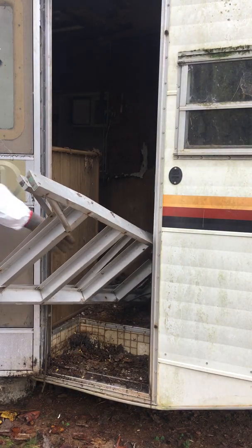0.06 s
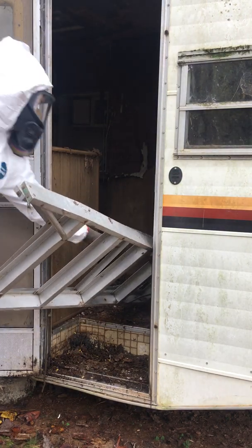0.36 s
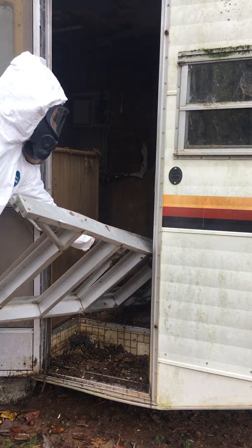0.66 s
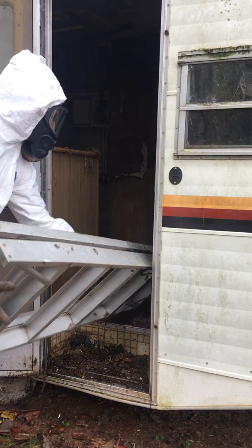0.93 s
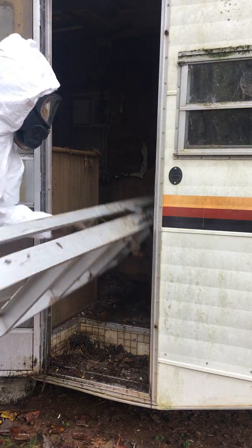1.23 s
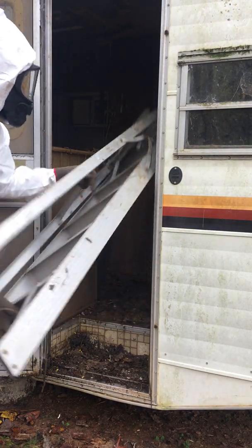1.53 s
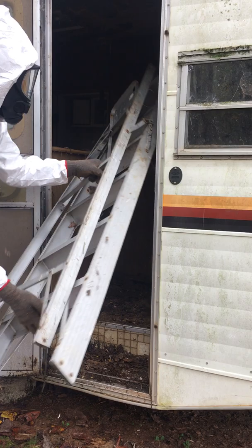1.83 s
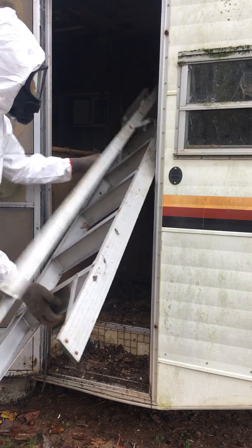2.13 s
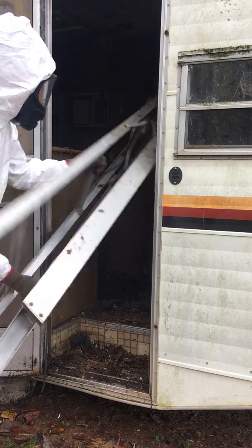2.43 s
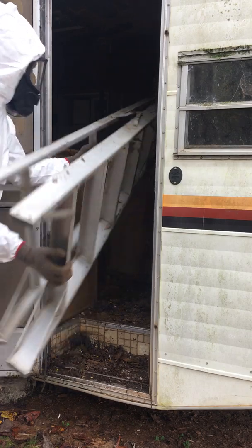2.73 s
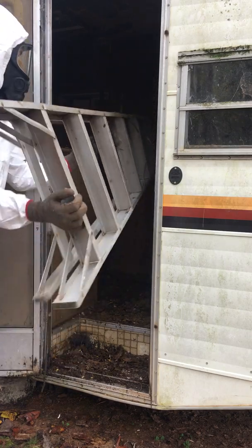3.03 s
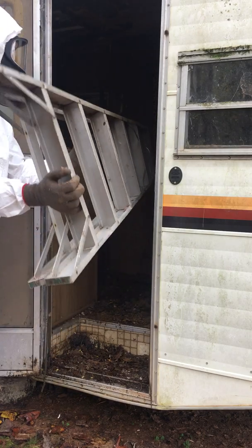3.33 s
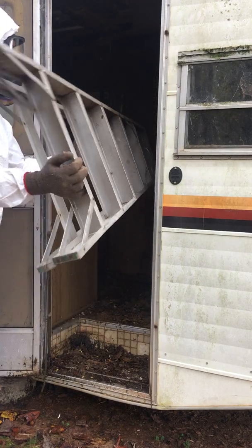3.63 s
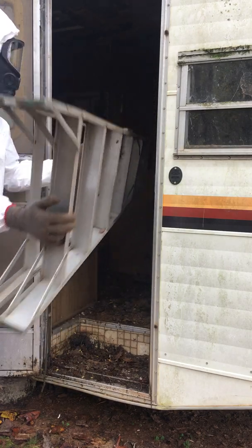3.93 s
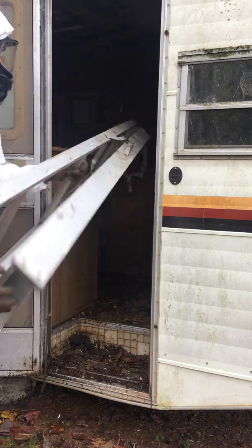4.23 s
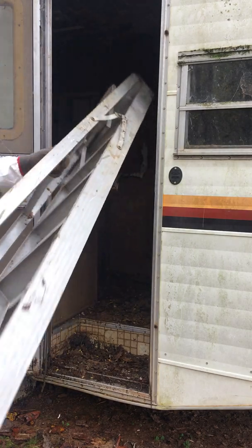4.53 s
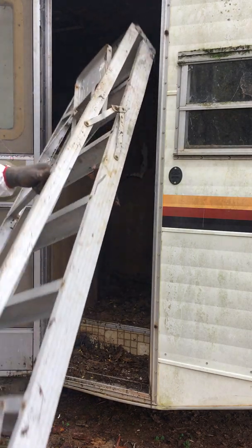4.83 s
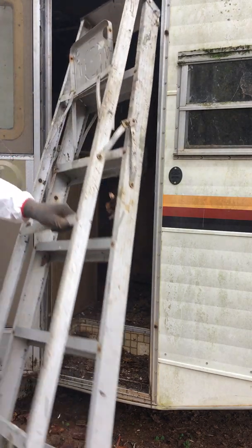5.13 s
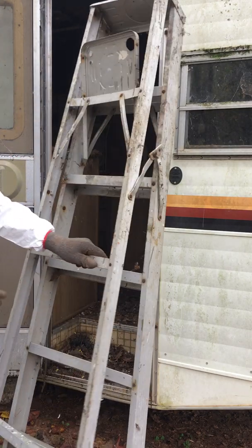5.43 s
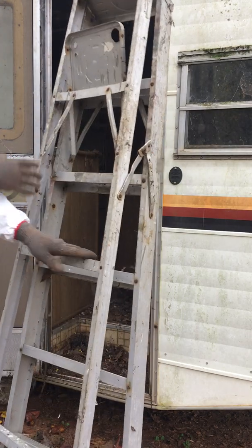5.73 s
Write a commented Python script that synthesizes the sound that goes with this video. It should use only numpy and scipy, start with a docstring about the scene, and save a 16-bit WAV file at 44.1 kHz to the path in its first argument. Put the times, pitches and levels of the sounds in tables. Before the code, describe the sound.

Hard metallic clatter and scraping as a folded ladder bumps a trailer's door frame, with faint clothing rustle and dull floor thuds.

```python
"""A folded aluminium step ladder is worked out through a trailer's narrow door, over a low outdoor rumble.
First coveralls rustle, gloves rub, the loose halves tap, the floor thuds and a glove squeaks. From 1.5 to 3.7 s
the halves clack hard and the rails knock and scrape on the door frame; the trailer answers briefly and a
limiter holds down the loudest blows. Near 4.4 s come a scrape and a heavier thud, then a faint squeak. At 5.5 s
the ladder is set on its feet and hums briefly."""
import sys
import numpy as np
from scipy import signal
from scipy.fft import rfft, irfft, next_fast_len
from scipy.io import wavfile
from scipy.ndimage import uniform_filter1d, minimum_filter1d, map_coordinates

SR = 44100
rng = np.random.default_rng(int(sys.argv[2]) if len(sys.argv) > 2 else 0)


def materialize(psi):
    """Save the field psi as 16-bit PCM at rate SR to the path in sys.argv[1].

    A 1-D psi becomes a single channel; in a 2-D psi each row is a channel.
    """
    bounded = np.clip(np.atleast_2d(psi).T, -1, 1)
    quanta = np.round(bounded * 32767).astype(np.int16)
    wavfile.write(sys.argv[1], SR, quanta)


N = 254452
TOP_HZ = 16000


def amp(db):
    """Decibels to gain."""
    return 10 ** (np.asarray(db) / 20)


def along(points, hz):
    """(Hz, value) points read on a log axis."""
    point_hz, values = np.transpose(points)
    return np.interp(np.log(hz + 1), np.log(point_hz + 1), values)


def wobble(knots_per_s):
    """Smooth random curve."""
    knots = rng.standard_normal(int(N * knots_per_s / SR) + 4)
    return map_coordinates(knots, [np.arange(N) * knots_per_s / SR])


def swell(middle_s, length_s):
    """Half-cosine rise and fall."""
    return np.cos(np.pi * np.clip((np.arange(N) / SR - middle_s) / length_s, -.5, .5))


def filtered(x, response):
    """x through a gain curve response(hz)."""
    size = next_fast_len(N + SR // 2)
    return irfft(rfft(x, size) * response(np.fft.rfftfreq(size, 1 / SR)), size)[:N]


def coloured(x, spectrum):
    """x shaped by (Hz, dB) points, at rms 1."""
    shaped = filtered(x, lambda hz: amp(along(spectrum, hz)))
    return shaped / np.sqrt(np.mean(shaped ** 2) + 1e-20)


def add(track, start_s, sound):
    """Mix a sound into the track."""
    part = track[round(start_s * SR):][:len(sound)]
    part += sound[:len(part)]


def grains(size, per_s):
    """Sparse tiny impacts of random strength."""
    return rng.standard_normal(size) * (rng.random(size) < per_s / SR)


def outdoors(level_db=-54):
    """Steady low rumble of the open air."""
    # Rumble spectrum. Each row: frequency in Hz, relative density in dB.
    spectrum = [(15, -29), (28, -17), (50, 6.5), (70, 1.5), (100, 1.5), (150, -6), (220, -9.5),
                (450, -20.5), (1500, -16), (8000, -35.5)]
    return amp(level_db) * coloured(rng.standard_normal(N), spectrum)


def coveralls(level_db=-1, rest_db=-64.5, flutter_db=1.4):
    """Cloth crinkles faintly and swishes with each arm movement."""
    # Cloth spectrum. Each row: frequency in Hz, relative density in dB.
    spectrum = [(500, 2), (2000, 2), (3400, 8), (4500, 0.5), (6200, 4.5), (10000, -3), (16000, -9)]
    # Arm movements. Each row: middle in seconds, length in seconds, relative level in dB.
    swishes = [(0.154, 0.36, -54.5), (0.445, 0.3, -53.5), (1.132, .26, -52.5), (1.276, 0.097, -53),
               (1.377, 0.029, -55), (1.81, 0.37, -49), (2.29, 0.51, -59), (4.134, 0.35, -53),
               (4.345, 0.17, -55), (4.606, 0.16, -56), (5.01, 0.75, -52), (5.628, 0.98, -54.5)]
    crinkle = coloured(grains(N, per_s=6000), spectrum)
    envelope = amp(rest_db)
    for middle_s, length_s, db in swishes:
        envelope = np.hypot(envelope, amp(db) * swell(middle_s, length_s))
    return crinkle * envelope * amp(level_db + flutter_db * wobble(39))


def gloves(modes, level_db=-1, hold_db=-64, flutter_db=1.4, attack_s=0.01, release_s=0.14):
    """Soft gloves rub the frame into a faint, dull ring, louder as the grip shifts."""
    # Friction spectrum. Each row: frequency in Hz, gain in dB.
    spectrum = [(100, -29), (220, -2.5), (450, -6.5), (800, 5.5), (1400, 5.5), (2200, 2), (3500, -6),
                (8000, -7.5)]
    # Slides along the rails. Each row: start in seconds, end in seconds, relative level in dB.
    slides = [(0.442, 0.713, -49.5), (0.746, 0.952, -46), (1.737, 2.66, -43.5), (2.794, 3.2, -58),
              (3.305, 3.807, -50), (4.007, 4.366, -53), (4.414, 4.62, -47.5), (4.877, 5.17, -51),
              (5.43, 5.653, -47.5)]
    hz, decays = modes
    t = np.arange(N) / SR
    ring = rng.choice([-1, 1], len(hz)).astype(np.float32) @ decays
    rub = coloured(signal.fftconvolve(grains(N, per_s=2500), ring)[:N], spectrum)
    envelope = amp(hold_db)
    for start_s, end_s, db in slides:
        stroke = np.clip((t - start_s) / attack_s, 0, 1) * np.exp(-np.maximum(t - end_s, 0) / release_s)
        envelope = np.maximum(envelope, amp(db) * stroke)
    return rub * envelope * amp(level_db + flutter_db * wobble(30))


def glove_squeaks(waver_hz=80):
    """A rubber glove squeaks on one unsteady tone as it slips."""
    # Squeaks. Each row: middle in seconds, length in seconds, pitch in Hz, peak level in dB.
    squeaks = [(1.28, .12, 1873, -56), (4.66, .14, 8436, -66)]
    track = np.zeros(N)
    for middle_s, length_s, hz, db in squeaks:
        phase = 2 * np.pi * np.cumsum(hz + waver_hz * wobble(140)) / SR
        track += amp(db) * swell(middle_s, length_s) * np.sin(phase)
    return track


def floor_thuds(level_db=-2, rise_s=0.0051):
    """Soft bumps set the hollow trailer floor booming."""
    # Bumps. Each row: start in seconds, relative level in dB.
    bumps = [(0.953, -34), (1.711, -35), (4.376, -24)]
    # Floor modes. Each row: frequency in Hz, gain in dB, T60 in seconds.
    floor_modes = [(51.3, -11, 0.37), (81.6, -11, 0.45), (107.6, 2.5, 0.12), (150, -3.5, 0.089),
                   (217.5, -5.5, 0.26), (355.6, -6.5, 0.2)]
    t = np.arange(SR // 2) / SR
    track = np.zeros(N)
    for start_s, db in bumps:
        boom = sum(amp(mode_db - 60 * t / t60_s) * np.sin(2 * np.pi * (hz * t + rng.random()))
                   for hz, mode_db, t60_s in floor_modes)
        add(track, start_s, amp(db + level_db) * boom * (1 - np.exp(-t / rise_s)))
    return track


def trailer_echo(sound, delay_s=0.0051):
    """Short diffuse answer of the doorway and the cabin behind it."""
    # Cabin decay. Each row: frequency in Hz, T60 in seconds.
    cabin_t60 = [(200, 0.27), (1200, 0.49), (4000, 0.3), (12000, 0.25)]
    hz, t, noise = signal.stft(rng.standard_normal(SR // 2), SR, nperseg=256)
    fade = amp(-60 * t / along(cabin_t60, hz)[:, None])
    tail = signal.istft(noise * fade, SR, nperseg=256)[1]
    tail = np.pad(tail, (round(delay_s * SR), 0))
    return signal.fftconvolve(sound, tail / np.linalg.norm(tail))[:len(sound)]


def doorway(rings, mean_delay_s=.007):
    """Door and side wall return duller copies, each at a random delay."""
    dull = signal.sosfilt(signal.butter(1, 5000, "lowpass", fs=SR, output="sos"), rings)
    delays = np.round(SR * mean_delay_s * (.5 + rng.random(len(rings)))).astype(int)
    return sum(np.pad(copy, (delay, 0))[:len(copy)] for copy, delay in zip(dull, delays))


def standing_ring(set_down_s=5.512, attack_s=0.0056):
    """Set on its feet and let go, the frame hums briefly."""
    # Low bending modes. Each row: frequency in Hz, level in dB, T60 in seconds.
    bending = [(167, -47, .8), (248, -48, .5)]
    t = np.maximum(np.arange(N) / SR - set_down_s, 0)
    hum = sum(amp(db - 60 * t / t60_s) * np.sin(2 * np.pi * hz * t) for hz, db, t60_s in bending)
    return hum * (1 - np.exp(-t / attack_s))


def ladder_modes(t, rail_t60_ratio=0.92, crowd_count=720, warp_hz=2500):
    """Frequencies and free decays: the strong modes plus the dense crowd of thin-walled profiles."""
    # Strong modes of rails and steps. Each row: frequency in Hz, gain in dB.
    rails = [(167, -4.5), (221, 4), (400, 0.5), (495, -5.5), (650, -3), (888, 3.5), (1202, 3.5),
             (1258, -15.5), (1437, -0.5), (1618, 2), (1836, 2.5), (2351, -5), (2730, -1.5), (3643, -6),
             (3889, -22.5), (4209, 2), (4595, 2), (5870, 0.5), (6900, -14)]
    # Radiation of the ladder. Each row: frequency in Hz, gain in dB.
    radiation = [(100, -51), (200, 2), (350, 3.5), (520, 6), (720, -1.5), (950, -2), (1300, 2), (2080, -2),
                 (2700, 2.5), (4200, 5), (6000, 2.5), (10000, -3.5), (16000, -17)]
    # Decay of the hand-held frame. Each row: frequency in Hz, T60 in seconds.
    damping = [(200, 0.37), (600, 0.32), (1300, 0.19), (2500, 0.17), (4500, 0.059), (12000, 0.07)]
    edges_hz = np.geomspace(150 + warp_hz, TOP_HZ + warp_hz, crowd_count + 1) - warp_hz
    spacing_hz = np.diff(edges_hz)
    crowd_hz = edges_hz[:-1] + spacing_hz * rng.random(crowd_count)
    rail_hz, rail_db = np.transpose(rails)
    hz = np.r_[rail_hz, crowd_hz]
    gain = np.r_[amp(rail_db), np.sqrt(spacing_hz / 40)] * amp(along(radiation, hz))
    t60_s = np.r_[rail_t60_ratio * along(damping, rail_hz), along(damping, crowd_hz)]
    phase = np.outer(2 * np.pi * hz, t).astype(np.float32)
    log_fade = np.outer(-np.log(1000) / t60_s, t).astype(np.float32)
    return hz, gain[:, None].astype(np.float32) * np.sin(phase) * np.exp(log_fade)


def excitation(hz, db, sizzle_db, part_hz, clang_db, full_blow_db=-7, step_hz=1386, scatter_db=3):
    """Mode gains of one contact. Light touches knock more, clang less; short, stiff parts do the reverse."""
    lighter_db, octaves = full_blow_db - db, np.log2(part_hz / step_hz)
    knock_db = -16 + 0.1769 * lighter_db - 3.5 * octaves
    clang_db = clang_db - 0.1959 * lighter_db + 7 * octaves
    hardness = [(450, knock_db), (950, 0), (1700, 0), (3000, clang_db), (5000, clang_db), (9000, sizzle_db)]
    # first and second bending modes of the struck part
    first_db = 4.5 * np.exp(-(np.log(hz / part_hz) / 0.14) ** 2)
    second_db = 3 * np.exp(-(np.log(hz / (2.806 * part_hz)) / 0.1) ** 2)
    return amp(along(hardness, hz) + first_db + second_db + scatter_db * rng.standard_normal(len(hz)))


def edge_crack(t, peak_s=0.0005):
    """Hard edges meet in a brief bright crack."""
    treble = signal.butter(1, 3000, "highpass", fs=SR, output="sos")
    return signal.sosfilt(treble, rng.standard_normal(len(t))) * t / peak_s * np.exp(1 - t / peak_s)


def contacts(events, t, modes, impact_db, rise_s, echo_db, crack_db, level_db, clang_db, clang_per_sizzle,
             wall_db=-3, detune=0.00853):
    """Each contact rings the frame with a first impact and a dying chatter of slips."""
    hz, decays = modes
    track = np.zeros(N)
    mid_band = signal.butter(3, [800, 2000], "bandpass", fs=SR, output="sos")
    onset = 1 - np.exp(-t / rise_s)
    for start_s, db, sizzle_db, chatter_s, part_hz in events:
        gains = excitation(hz, db, sizzle_db, part_hz, clang_db + clang_per_sizzle * sizzle_db)
        # each touching point and direction of radiation has its own mix of modes
        mixes = (gains * rng.choice([-1, 1], (5, len(hz)))).astype(np.float32)
        direct, left_rail, right_rail, *sideways = mixes @ decays
        sound = amp(impact_db) * (direct + amp(wall_db) * doorway(sideways))
        for rail in (left_rail, right_rail):
            slips = grains(len(t), per_s=3000) * np.exp(-t / chatter_s) * onset
            sound += signal.fftconvolve(rail, slips / (np.linalg.norm(slips) + 1e-9))[:len(t)]
        # grip and load shift the modes from blow to blow
        pitch_ratio = 1 + detune * rng.standard_normal()
        sound = map_coordinates(sound * onset, [np.arange(len(t)) * pitch_ratio])
        mid_power = uniform_filter1d(signal.sosfilt(mid_band, sound) ** 2, size=900)
        sound = sound / np.sqrt(mid_power.max()) + amp(sizzle_db + crack_db) * edge_crack(t)
        add(track, start_s, amp(db + level_db) * (sound + amp(echo_db) * trailer_echo(sound)))
    return track


def ladder(t, modes, lowest_hz=130):
    """Sharp clacks and longer scrapes ring one frame, too slender to radiate deep bass."""
    # Halves and rails clacking. Each row: start in seconds, relative level in dB, sizzle (edge
    # hardness) in dB, chatter time constant in seconds, pitch of the struck part in Hz.
    blows = [(0.503, -24, -1, 0.0073, 1550), (0.586, -21.5, 2, .002, 1530), (0.623, -30, -2.5, .004, 1310),
             (0.935, -29, -15.5, 0.0031, 880), (1.499, -17, -2, .007, 1350), (1.59, -9, -7, 0.002, 1210),
             (1.686, -24.5, -12.5, .0025, 1210), (1.82, -9.5, -6.5, 0.0021, 1470),
             (1.85, -13, -7.5, 0.015, 1180), (1.932, -16, 3, 0.0093, 1280), (2.022, -11, -5, 0.0026, 1250),
             (2.044, -14, -9.5, 0.017, 1060), (2.177, -28, -16, 0.0048, 1510),
             (2.189, -10, -5.5, 0.015, 1450), (2.363, -9, -5.5, 0.0017, 1230),
             (2.419, -24, -13.5, 0.0045, 1140), (2.55, -8.5, -2, .003, 1285),
             (2.733, -30.5, -15, 0.0017, 920), (2.783, -9, 0, 0.0045, 1470),
             (2.797, -13, -4.5, 0.009, 1130), (2.912, -14, 5.5, 0.0023, 1350),
             (3.0, -9.5, -5.5, 0.0056, 1400), (3.089, -13, 4, 0.0015, 1500),
             (3.257, -17.5, -3.5, 0.0012, 1130), (3.346, -31.5, -18, 0.0027, 950),
             (3.426, -14.5, -10, 0.006, 1890), (3.513, -14.5, -6, 0.0055, 2050),
             (3.589, -29, -15, 0.0043, 920), (3.666, -14.5, -9, 0.0043, 1760),
             (3.741, -31, -15.5, .004, 1130), (3.891, -37.5, -8, 0.015, 1130),
             (4.195, -42, -3, 0.0026, 1470), (4.992, -47, -6, .005, 1420),
             (5.343, -29.5, -10.5, 0.039, 1010), (5.51, -15.5, -10.5, 0.0015, 1500),
             (5.563, -31, -9, 0.024, 1390)]
    # Rails dragging over door frame and ground. Same columns.
    drags = [(0.398, -41.5, -20, 0.0091, 920), (0.728, -34, -19, .03, 1220),
             (0.785, -28.5, -12.5, 0.026, 1190), (1.443, -30.5, -11.5, 0.066, 1580),
             (1.487, -23.5, -15, 0.008, 2520), (1.919, -17, -6, 0.012, 1210), (2.507, -28, -27, .007, 1250),
             (2.831, -26, 2.5, 0.028, 1420), (3.027, -21.5, -2.5, 0.024, 940),
             (3.189, -28.5, -8.5, 0.044, 880), (4.372, -18, -15.5, 0.027, 1190),
             (4.421, -25.5, -11, 0.012, 1310), (4.459, -24, -14, 0.0094, 1300),
             (4.496, -28, -7.5, 0.007, 1450), (4.952, -40, -2, 0.025, 1400), (5.387, -24, -8, 0.02, 2270)]
    clacks = contacts(blows, t, modes, impact_db=3, rise_s=0.00053, echo_db=-18, crack_db=4,
                      level_db=-8, clang_db=-0.5, clang_per_sizzle=0.071)
    scrapes = contacts(drags, t, modes, impact_db=-7, rise_s=0.0002, echo_db=-23, crack_db=-7,
                       level_db=-8.5, clang_db=3.5, clang_per_sizzle=0.63)
    return signal.sosfilt(signal.butter(2, lowest_hz, "highpass", fs=SR, output="sos"), clacks + scrapes)


def scene():
    """All sources at one microphone a few steps from the door."""
    t = np.arange(2 * SR // 5) / SR  # 0.4 s of ring per contact
    modes = ladder_modes(t)
    mix = ladder(t, modes) + floor_thuds() + gloves(modes) + coveralls()
    return (mix + outdoors() + standing_ring() + glove_squeaks())[None]


def record(dry, ceiling=.71, window_samples=90, bass_cut_hz=32):
    """Fast look-ahead limiter, microphone bass roll-off, band limit."""
    needed_gain = np.minimum(1, ceiling / (np.abs(dry[0]) + 1e-9))
    gain = uniform_filter1d(minimum_filter1d(needed_gain, window_samples), window_samples)
    held = signal.sosfilt(signal.butter(2, bass_cut_hz, "highpass", fs=SR, output="sos"), dry[0] * gain)
    return filtered(held, lambda hz: 1 / (1 + (hz / TOP_HZ) ** 100))[None]


dry = scene()
out = record(dry)
materialize(out)
```